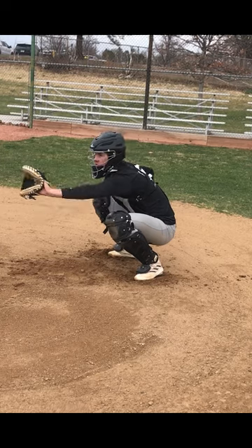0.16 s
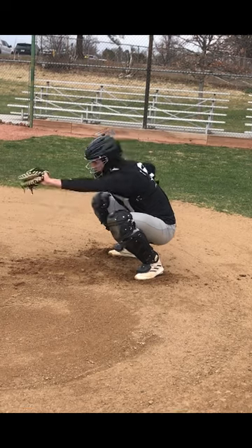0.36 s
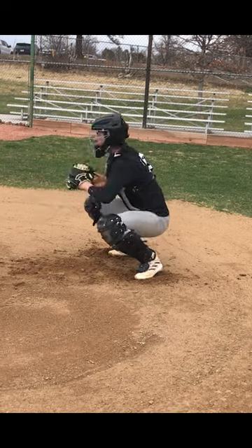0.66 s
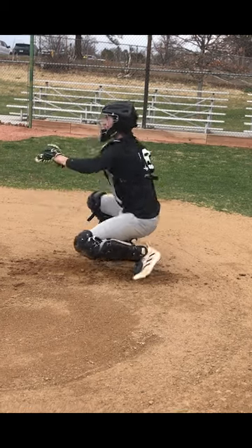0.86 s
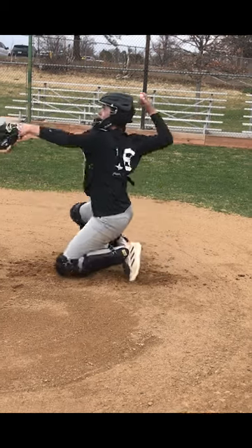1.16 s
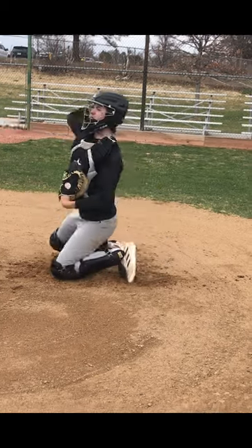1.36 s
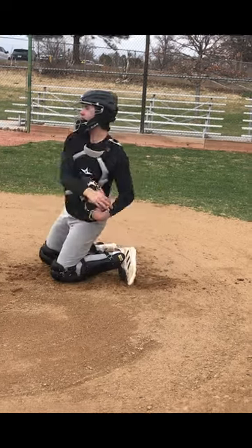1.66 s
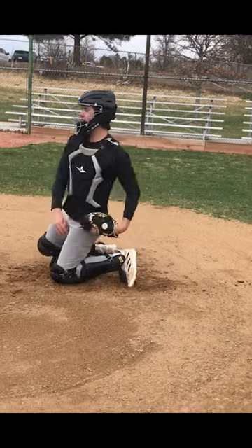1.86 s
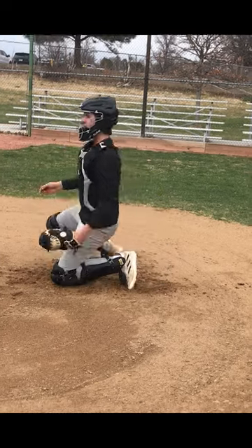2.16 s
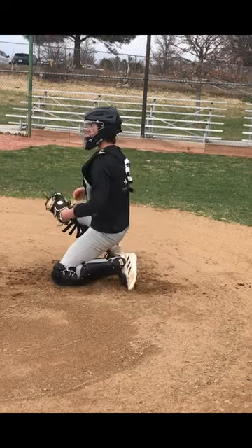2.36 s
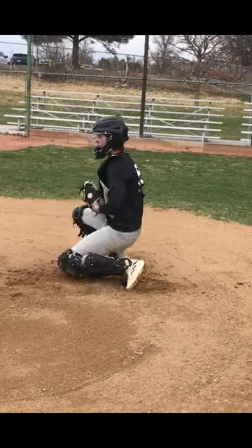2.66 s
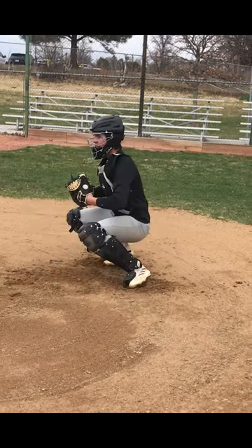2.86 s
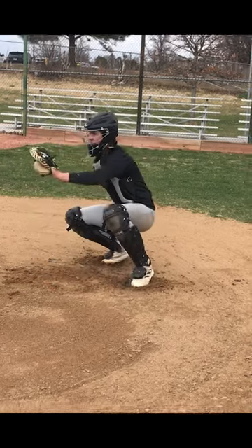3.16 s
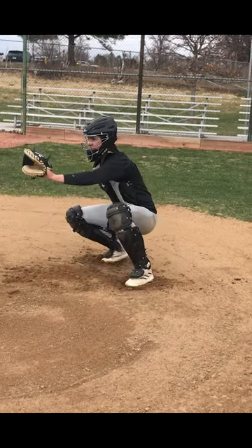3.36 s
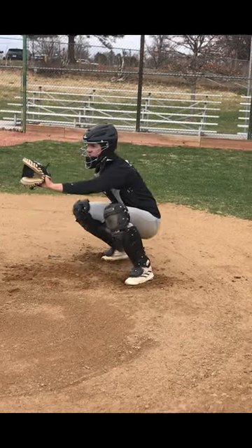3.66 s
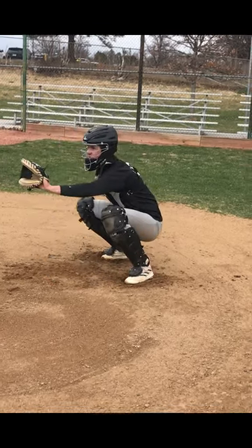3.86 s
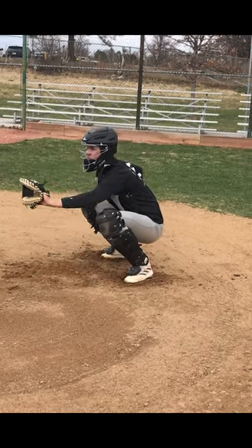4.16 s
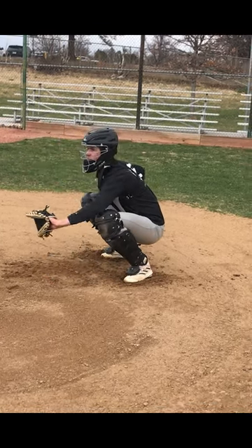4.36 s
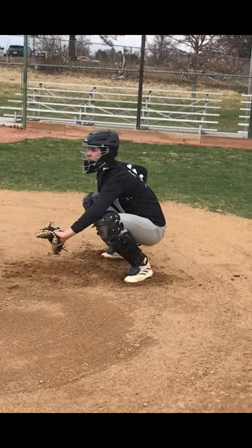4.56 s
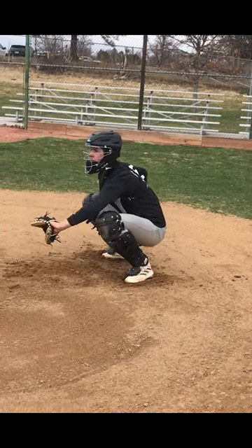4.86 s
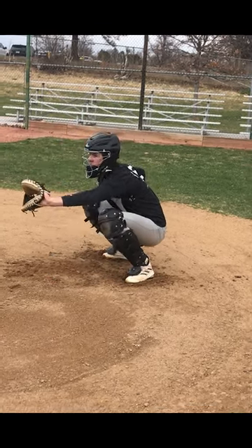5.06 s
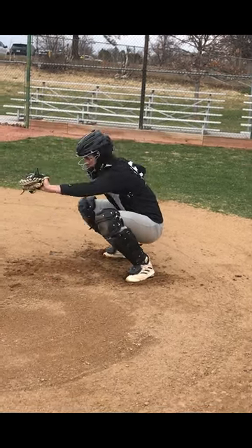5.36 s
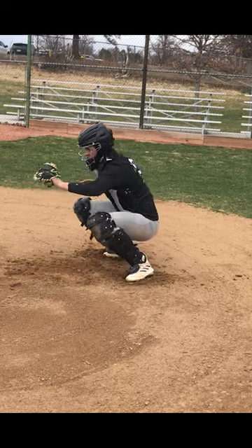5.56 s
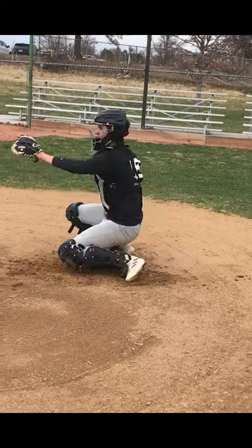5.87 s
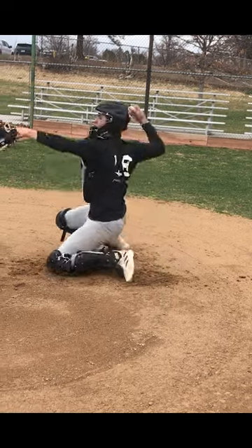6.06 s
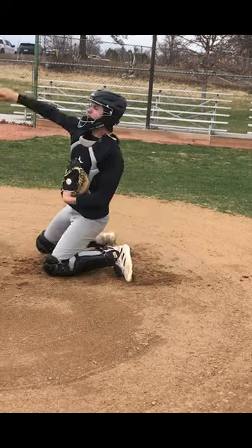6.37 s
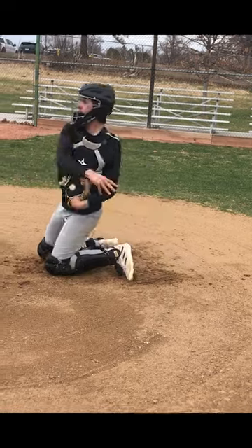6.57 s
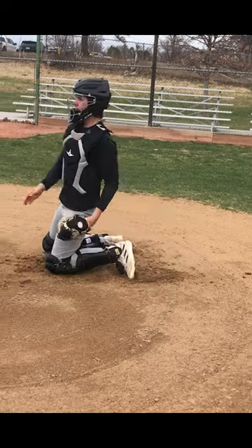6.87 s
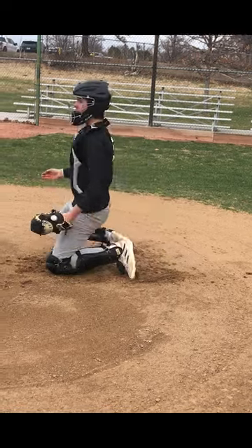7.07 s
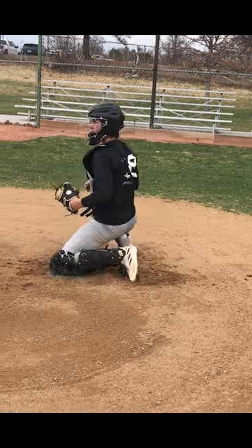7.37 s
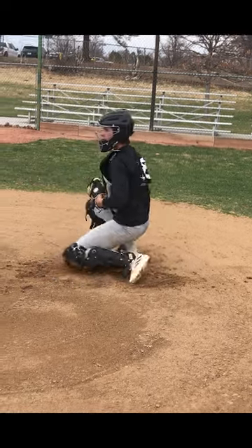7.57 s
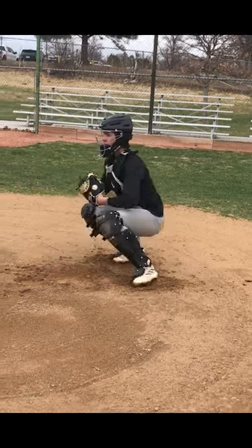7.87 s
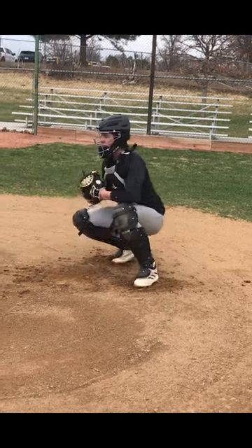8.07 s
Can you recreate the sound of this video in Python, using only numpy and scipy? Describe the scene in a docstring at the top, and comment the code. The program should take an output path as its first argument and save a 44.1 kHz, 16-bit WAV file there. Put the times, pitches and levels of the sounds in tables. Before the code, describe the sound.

Two hard baseball pops crack into a catcher's mitt on an open field, each answered by a softer distant glove catch, with wind rumbling on the microphone.

```python
"""Open ball field, baseball practice: two pitches pop into a catcher's mitt, two return throws into a glove.
Each pop is leather modes and cracks of noise, thrown back by fences and bleachers as scattered delays.
Filtered noise makes the wind at the microphone, far traffic, and the catcher's gear rubbing and scraping on dirt.
Small ticks are short noise bursts; a faint far whistle is a gliding sine.
A distant crow caws three times in harmonics shaped by its throat."""
import sys
import numpy as np
from scipy import signal
from scipy.fft import rfft, irfft
from scipy.io import wavfile
from scipy.ndimage import uniform_filter1d

SR = 44100
rng = np.random.default_rng(int(sys.argv[2]) if len(sys.argv) > 2 else 0)


def pcm_store(signal):
    """Save signal as 16-bit PCM."""
    levels = np.round(np.clip(np.atleast_2d(signal), -1, 1) * 32767)
    wavfile.write(sys.argv[1], SR, levels.astype(np.int16).T)


N = 362502
TIME, BINS = np.arange(N) / SR, np.fft.rfftfreq(N, 1 / SR)

# wind spectra at the microphone, breeze and gust, then the flutter of gusts: freq_hz, relative level_db_per_hz
BREEZE_SPECTRUM = [(15, -37.5), (25, -27.5), (48, 2.5), (70, 0.5), (114, -1.5), (150, -4), (290, -18),
                   (500, -42.5), (1000, -69)]
GUST_SPECTRUM = [(15, -36), (35, -29.5), (60, 10.5), (100, 6.5), (170, -7.5), (280, -21.5), (450, -42.5),
                 (1500, -68)]
FLUTTER_SPECTRUM = [(80, -19.5), (170, -1.5), (270, -3), (400, -10), (600, -25.5), (1200, -47.5),
                    (4000, -71)]
# gusts, before the wind's trim: start_s, hold_s, level_db, time to sink 20 dB fall_s (0.01 s at the least)
GUSTS = [(-.1, 0.25, -32, 0.92), (0.328, 0.13, -33, 0.25), (0.95, 0.017, -43, 1.35),
         (1.427, .03, -38.5, -0.08), (1.652, .005, -42.5, -0.07), (4.4, 0.082, -44.5, 0.5),
         (4.662, 0.015, -42, 0.2), (5.765, 0.0089, -47, 2.5), (5.963, 0.51, -28, 0.47),
         (6.628, 0.58, -32, -0.55), (7.28, .32, -28.5, 0.5), (7.8, 0.98, -32, 6)]
BREEZE_DB, GUST_RISE_S = -51.5, 0.041  # breeze between gusts, before the trim; how fast a gust arrives
# the strongest eddies knock on the microphone: time_s, peak_db, pitch_hz
BUFFETS = [(0.061, -18.5, 90), (0.19, -26.5, 125), (1.496, -24, 64), (6.018, -17.5, 145.7),
           (6.238, -16.5, 175), (6.392, -22, 142), (6.495, -18, 104), (6.734, -13.5, 120),
           (7.165, -14, 85.4), (7.355, -14, 154), (7.5, -16.5, 172), (7.601, -20, 169)]
# far traffic: freq_hz, relative level_db_per_hz
TRAFFIC_SPECTRUM = [(150, -24), (250, -5), (366, -9), (399, -11), (509, -14), (684, -5.5), (951, -4),
                    (1190, -10.5), (1600, -18), (1710, -19), (2040, -24.5), (2560, -30), (8030, -39),
                    (9060, -35.5), (15800, -47.5)]
TRAFFIC_DB = -54.5
# ticks of buckles, laces and pebbles, or a sharp single echo after a pop: time_s, peak_db, centre_hz, t60_s
TICKS = [(0.245, -38.5, 6000, 0.004), (0.318, -33, 5510, 0.005), (0.3432, -29.5, 7400, 0.0072),
         (0.35, -35, 3040, 0.0097), (0.375, -32, 2380, 0.017), (3.338, -47, 3890, 0.029),
         (5.325, -37.5, 8800, 0.01), (6.237, -43, 8000, 0.023), (6.312, -40.5, 6350, 0.024),
         (6.854, -44, 7000, 0.004), (7.399, -35.5, 5500, .008)]
# leather blows, a few to a catch as the ball lands and the pocket folds round it:
# time_s, level_db, pitch_factor, palm_thump_db, leather_slap_db, crack_db, crack_t60_s
MITT_BLOWS = [(0.2679, -9.6, .99, -2.2, 1.8, 7.8, .0018), (0.2692, -.5, 1.05, -4.5, -26, -12.5, .014),
              (0.2732, -23.7, .98, 18.4, 11.3, 5.8, .023), (5.1997, -10.4, 1.06, -6.3, -1.6, 2.7, .0017),
              (5.2011, -14.5, 1.03, -2.6, 16.4, 5.3, .021), (5.2039, -14.9, .94, 7.9, 4.7, 1.7, .011),
              (5.2061, -10.6, .99, -3.7, -6.8, -6.9, .006)]
GLOVE_BLOWS = [(2.0974, -7.5, 1.114, -18, -2.5, -6.5, 0.00066), (2.0987, -5, .98, 3, -5, -15, 0.022),
               (7.0059, -6, 1.113, 6, 4, -1, 0.0055), (7.0068, -17.5, 1.44, -14, -22, -18, 0.0055),
               (7.0078, -41, 1.55, -11, 20, 17, 0.046)]
# what each glove rings with: pitch_hz, level_db, t60_s
MITT_MODES = [(187.0, -27.2, 0.013), (301.0, -8.8, 0.057), (756.0, -8.7, 0.029), (867.0, -10.8, 0.031),
              (1330.0, -17.5, 0.007), (1611.0, -10.6, 0.014), (2364.0, -22.7, 0.019),
              (3064.0, -24.9, 0.023)]
GLOVE_MODES = [(147.0, -27.4, 0.077), (315.0, -16.1, 0.022), (788.0, -15.0, 0.025), (854.0, -1.5, 0.015),
               (1237.0, -8.1, 0.011), (1711.0, -11.6, 0.008), (2326.0, -21.3, 0.015),
               (4106.0, -16.8, 0.004)]
# the crack of hide on leather: freq_hz, level_db_per_hz
MITT_CRACK = [(300, -12.5), (1200, 17), (2400, 10), (4000, 13), (4900, 3), (5700, 10.5), (8500, 8),
              (11000, 3), (16000, -18)]
GLOVE_CRACK = [(300, -27), (1200, -28), (2400, 9), (3300, 17), (4900, 4.5), (5600, 14), (7500, 10.5),
               (10000, -6.5), (13000, -61), (16000, -22)]
# echoes of fences and bleachers, heard from plate and mound: delay_s, level_db, scatter_t60_s
PLATE_ECHOES = [(.007, -34, .1), (.056, -36, .12), (.076, -33, 0.18), (0.104, -40, 0.15)]
MOUND_ECHOES = [(.004, -18.5, 0.1), (0.0193, -19, 0.012), (.056, -23.5, 0.8), (.064, -30, 0.0079),
                (0.0876, -15, 0.0079), (.09, -20, 0.14), (0.097, -20, 0.11), (0.1195, -16, 0.05),
                (0.125, -32, 0.18)]
# thin poles and planks return mostly treble: freq_hz, gain_db
PLATE_COLOUR = [(100, -6), (500, -1), (900, -6), (1600, 9.5), (3000, 8.5), (6000, 5), (10000, 3),
                (16000, -7)]
MOUND_COLOUR = [(100, 2), (400, -6.5), (900, -14), (1600, 0.5), (3200, 4.5), (6000, -3.5), (10000, 3),
                (16000, -5)]
# how strongly the glove faces the fences at each catch: time_s, gain_db
FENCE_FACING = [(0.27, 4.5), (2.1, 2), (5.2, -3.5), (7.0, 0.5)]
# the catcher frames a pitch, kneels, throws, rises, drags and sets his feet, reaches for the next pitch,
# kneels, throws, drags a foot and rises: start_s, length_s, cloth_and_pads_db, dirt_grit_db (before trims)
MOVEMENTS = [(0.453, 0.15, -62, -91), (1.127, 0.24, -57.5, -62), (1.28, 0.43, -61, -65.5),
             (1.502, 0.61, -56.5, -72), (2.244, 0.87, -64, -76), (2.545, 0.1, -51.5, -56.5),
             (3.039, 0.017, -60, -64), (3.298, 0.081, -61.5, -73.5), (4.984, 0.43, -71.5, -71.5),
             (6.02, 0.46, -57.5, -63), (6.307, 0.015, -44.5, -62), (6.308, 0.67, -59, -65.5),
             (7.429, .14, -42, -50.5), (7.321, 0.32, -55, -67)]
RISE_SHARE = 0.25  # a movement builds up over this share of its length, then dies away
# rubbing cloth and pads, then grinding dirt: freq_hz, relative level_db_per_hz
CLOTH_SPECTRUM = [(600, -6), (1500, 5), (2800, 1), (4200, -2), (5000, -18), (6500, -8.5), (10000, -11.5),
                  (16000, -26)]
GRIT_SPECTRUM = [(2000, 6), (4500, 5), (6300, 8), (7600, -1), (9000, 10), (10500, -1), (13000, 4),
                 (16000, -4.5)]
# a faint far whistle that rises, then sinks: start_s, length_s, first_hz, last_hz, level_db
WHISTLE_GLIDES = [(0.831, .2, 1328, 1545, -59.5), (1.56, 0.55, 1270, 1192, -57)]
# crow caws: start_s, level_db, top_pitch_hz
CAWS = [(7.145, -55.5, 424.4), (7.53, -55.5, 424), (7.982, -55, 434.5)]
# resonance of the crow's throat: freq_hz, gain_db
CROW_THROAT = [(700, -32), (1000, -2), (1280, 10.5), (1650, 3), (2100, -4.5), (2800, -18), (3900, -14.5),
               (5000, -44)]
EDGE_HZ = 15900  # upper band limit


def amp(db):
    """Decibels to gain."""
    return 10 ** (np.asarray(db) / 20)


def evened(x):
    """Scales to rms 1."""
    return x / np.sqrt(np.mean(x ** 2) + 1e-20)


def read(points, hz):
    """Reads a spectrum in dB on a log-frequency axis."""
    f, db = np.transpose(points)
    return np.interp(np.log(hz + 1), np.log(f + 1), db)


def add(mix, s, sound):
    """Mixes a sound in at s seconds."""
    part = mix[max(round(s * SR), 0):][:len(sound)]
    part += sound[:len(part)]


def noise(spectrum):
    """Steady noise of rms 1 with the given spectrum."""
    white = rfft(rng.standard_normal(N))
    return evened(irfft(white * amp(read(spectrum, BINS)), N))


def drift(per_s):
    """Slow chance of rms 1: straight lines between random heights, two heights to a cycle."""
    steps = TIME * 2 * per_s
    heights = rng.standard_normal(N // 50)
    return evened(np.interp(steps, np.arange(len(heights)), heights))


def dying(t60):
    """An envelope that falls 60 dB in t60, cut off after a third of a second."""
    return np.exp(-np.log(1000) * TIME[:SR // 3] / max(t60, 1e-4))


def burst(t60, count=3):
    """A dying puff of noise with energy 1; each pass evens its spectrum and fades it again."""
    fall = dying(t60)
    x = rng.standard_normal(len(fall)) * fall
    for _ in range(count):
        flat = irfft(np.exp(1j * np.angle(rfft(x))), len(fall))
        x = flat * np.sqrt(fall)
    return x / np.linalg.norm(x)


def coloured(x, spectrum):
    """Causal minimum-phase filter with the given spectrum."""
    hz = abs(np.fft.fftfreq(4096, 1 / SR))
    log_gain = np.log(amp(read(spectrum, hz)))
    # the Hilbert transform of the log gain gives the phase
    response = np.fft.ifft(np.exp(signal.hilbert(log_gain).conj())).real
    return signal.oaconvolve(x, response[:len(log_gain) // 2])[:len(x)]


def wind_level():
    """Each gust rises, holds and sinks back into the breeze; powers add, result in dB."""
    power = amp(BREEZE_DB) ** 2
    for start, hold, db, fall_s in GUSTS:
        rise = np.clip((TIME - start) / GUST_RISE_S, 0, 1)
        sinking = np.maximum(TIME - start - GUST_RISE_S - hold, 0)
        gust = rise * amp(db - 20 * sinking / max(fall_s, .01))
        power = power + gust ** 2
    return 10 * np.log10(power)


def wind(gust_db=-42, blend_db=4, flutter_db=-13, trim_db=1):
    """Turbulence at the microphone: a soft rumble; gusts add a flutter that comes in separate thumps."""
    lumpy_db, surge_db = 7.5, 3
    level_db = wind_level()
    # the gust's share of the power nears one half when it blows hard
    share = 1 / (2 + np.exp((gust_db - level_db) / blend_db))
    air = np.sqrt(1 - share) * noise(BREEZE_SPECTRUM) + np.sqrt(share) * noise(GUST_SPECTRUM)
    # level out the chance swells, so that the gusts set the level
    air_power = uniform_filter1d(uniform_filter1d(air ** 2, size=3500), size=3500)
    air /= np.sqrt(air_power)
    thumps = evened(amp(lumpy_db * np.minimum(drift(20), 2)))
    flutter = noise(FLUTTER_SPECTRUM) * thumps
    gain = amp(level_db + trim_db + surge_db * share * drift(8))
    out = gain * (air + amp(flutter_db) * share * flutter)
    t = np.arange(-SR // 20, SR // 20) / SR
    for s, db, hz in BUFFETS:
        u = (np.pi * hz * t) ** 2
        knock = (1 - 3 * u) / (1 + u) ** 3  # a push between two sucks
        add(out, s + t[0], amp(db) * knock * np.hanning(len(t)))
    return out


def traffic():
    """Tyre noise from a far road, barely wavering."""
    waver_db = .25
    return amp(TRAFFIC_DB + waver_db * drift(6.9)) * noise(TRAFFIC_SPECTRUM)


def ticks(octaves=1.0):
    """Small dry clicks, each a noise burst in its own broad band."""
    out = np.zeros(N)
    for s, db, hz, t60 in TICKS:
        # 6 dB down at this many octaves from the centre
        band = [(f, -6 * (np.log2(f / hz) / octaves) ** 2) for f in hz * 2. ** np.arange(-3, 3)]
        click = coloured(burst(t60), band)
        add(out, s, amp(db) * click / abs(click).max())
    return out


def catches(blows, modes, hide):
    """Each blow cracks on the hide and rings the palm (low), the pocket's air (middle) and the leather (high)."""
    palm_hz, slap_hz = 450, 1100  # palm below, leather above
    ring, crack = np.zeros(N), np.zeros(N)
    for s, db, pitch, thump_db, slap_db, snap_db, snap_t60 in blows:
        for hz, mode_db, t60 in modes:
            fall = dying(t60)
            part_db = thump_db if hz < palm_hz else slap_db if hz > slap_hz else 0
            tone = np.sin(2 * np.pi * hz * pitch * TIME[:len(fall)])
            add(ring, s, amp(db + mode_db + part_db) * fall * tone)
        add(crack, s, amp(db + snap_db) * burst(snap_t60))
    # so small a body radiates little bass
    radiated = signal.lfilter(*signal.butter(2, 100, "high", fs=SR), ring + 1e-18)
    return radiated + coloured(crack, hide)


def clatter(t60):
    """Separate reflections from many poles and planks, dying away; energy 1."""
    taps_per_s = 700
    fall = dying(t60)
    taps = fall * rng.standard_normal(len(fall)) * (rng.random(len(fall)) < taps_per_s / SR)
    taps[0] = 1  # the nearest face answers first
    return taps / np.linalg.norm(taps)


def field(pop, echoes, colour, far_db=-40, far_t60=0.62, count=3):
    """Direct sound, scattered echoes and a faint wash from far trees; the crack differs with direction."""
    facing = amp(np.interp(TIME, *np.transpose(FENCE_FACING)))
    directions = [pop() for _ in range(count)]
    # the far wash is split over the directions
    responses = [amp(far_db) * burst(far_t60) / np.sqrt(count) for _ in directions]
    for k, (delay, db, t60) in enumerate(echoes):
        add(responses[k % count], delay, amp(db) * clatter(t60))
    thrown = sum(signal.oaconvolve(x * facing, response)[:N] for x, response in zip(directions, responses))
    return directions[0] + coloured(thrown, colour)


def swell(start, length):
    """A movement's envelope: it builds up evenly and dies away."""
    return np.interp(TIME, start + length * np.array([0, RISE_SHARE, 1]), [0, 1, 0])


def movements(grains_per_s=2200, cloth_db=-1, grit_db=0):
    """Cloth and pads rub while shoes and shin guards grind clumps of small grains in the dirt."""
    grain_db, clump_db = 3.8, 2.6  # spread of grain sizes, unevenness of the rubbing
    cloth, grit = np.zeros(N), np.zeros(N)
    for start, length, rub_db, grind_db in MOVEMENTS:
        envelope = swell(start, length)
        cloth = np.maximum(cloth, amp(rub_db) * envelope)
        grit = np.maximum(grit, amp(grind_db) * envelope)
    sizes = amp(grain_db * np.minimum(rng.exponential(1, N), 4)) * rng.standard_normal(N)
    struck = rng.random(N) < grains_per_s / SR
    grains = evened(coloured(sizes * struck, GRIT_SPECTRUM))
    rubbing = amp(cloth_db) * cloth * noise(CLOTH_SPECTRUM)
    grinding = amp(grit_db) * grit * grains
    return (rubbing + grinding) * amp(clump_db * drift(70))


def whistle():
    """A thin far tone that swells and fades as it glides, blurred on its way through the moving air."""
    waver_db, blur = 1.0, .012  # blur is a share of the pitch
    out = np.zeros(N)
    for start, length, first_hz, last_hz, db in WHISTLE_GLIDES:
        along = np.clip((TIME - start) / length, 0, 1)
        pitch = (first_hz + (last_hz - first_hz) * along) * (1 + blur * drift(60))
        out += amp(db) * np.sin(np.pi * along) * np.sin(2 * np.pi * np.cumsum(pitch) / SR)
    return out * amp(waver_db * drift(23))


def crow(length_s=.23, wet=.45, trees_t60=.6):
    """Caws that leap up in pitch, then sink and turn hoarse, with their echo from the trees."""
    rough_top, rough_end = .025, .09  # pitch jitter as a share of the pitch
    out, t = np.zeros(N), np.arange(0, length_s, 1 / SR)
    along = t / length_s
    arch = np.interp(along, [0, .15, .28, .57, 1], [.76, .95, 1, .9, .78])
    loudness = np.interp(along, [0, .28, .57, 1], [.5, 1, .75, .3])
    rough = np.interp(along, [.35, .55], [rough_top, rough_end])
    jitter = drift(150)
    for s, db, top_hz in CAWS:
        caw_jitter = np.roll(jitter, -round(s * SR))[:len(t)]
        hz = top_hz * arch * (1 + rough * caw_jitter)
        phase = 2 * np.pi * np.cumsum(hz) / SR
        # harmonics 2 to 11, each as loud as the throat lets it through
        call = sum(amp(read(CROW_THROAT, k * hz)) * np.sin(k * phase) for k in range(2, 12))
        add(out, s, amp(db) * evened(call * loudness))
    return out + wet * signal.oaconvolve(out, burst(trees_t60))[:N]


def scene():
    """Both gloves in the open field, with the catcher's gear, the wind and the far sounds."""
    background = wind() + traffic()
    small_clicks = ticks()
    pitches = field(lambda: catches(MITT_BLOWS, MITT_MODES, MITT_CRACK), PLATE_ECHOES, PLATE_COLOUR)
    returns = field(lambda: catches(GLOVE_BLOWS, GLOVE_MODES, GLOVE_CRACK), MOUND_ECHOES, MOUND_COLOUR)
    return (background + small_clicks + pitches + returns + movements() + whistle() + crow())[None]


def record(dry, knee_db=-20, duck_share=0.32, recover_db_per_s=9):
    """Peaks overload softly, gain control dips after sound above the knee and recovers; then the band limit."""
    rounded = dry / (1 + (dry / .75) ** 6) ** (1 / 6)
    keep = np.exp(-1 / (.008 * SR))  # 8 ms smoothing
    power = signal.lfilter([1 - keep], [1, -keep], rounded[0] ** 2)
    power_db = 10 * np.log10(power + 1e-12)
    # the deepest dip so far holds, less what has recovered since
    recovery = recover_db_per_s * TIME
    wanted_db = duck_share * np.maximum(power_db - knee_db, 0)
    duck_db = np.maximum.accumulate(wanted_db + recovery) - recovery
    ducked = rounded * amp(-signal.lfilter([1 - keep], [1, -keep], duck_db))
    band_limit = signal.firwin(511, EDGE_HZ, window=("kaiser", 9), fs=SR)
    return signal.oaconvolve(ducked, band_limit[None], "same")


dry = scene()
out = record(dry)
pcm_store(out)
```